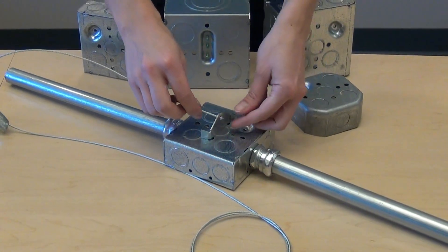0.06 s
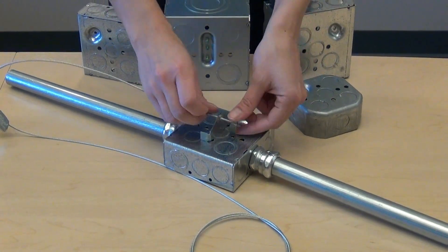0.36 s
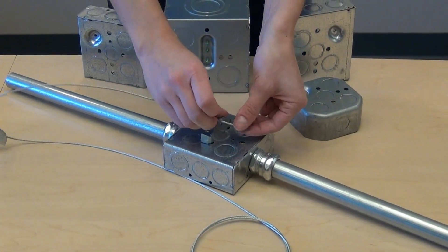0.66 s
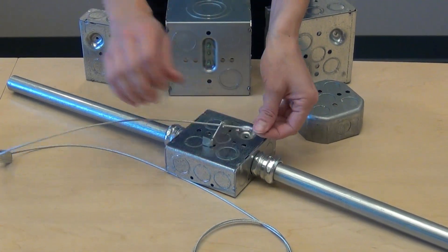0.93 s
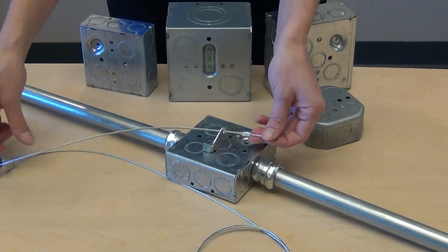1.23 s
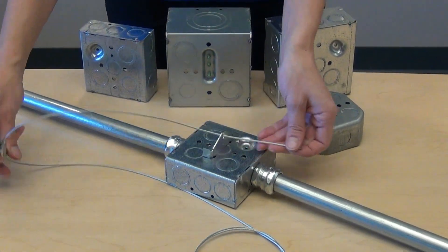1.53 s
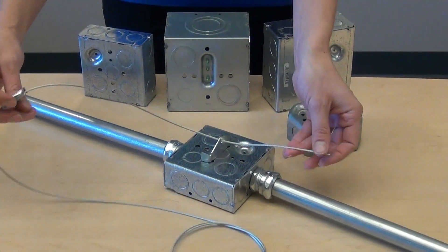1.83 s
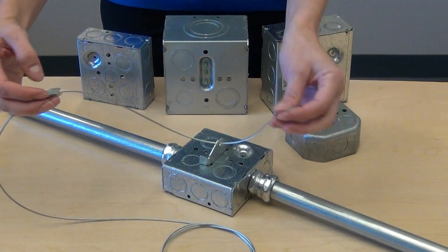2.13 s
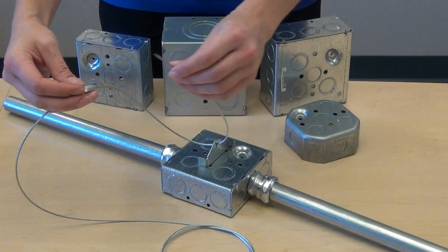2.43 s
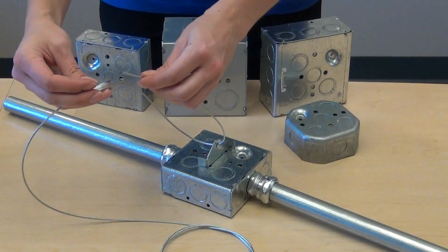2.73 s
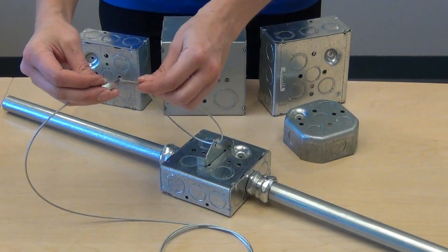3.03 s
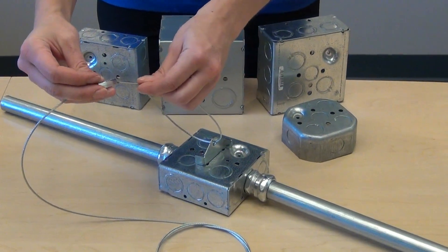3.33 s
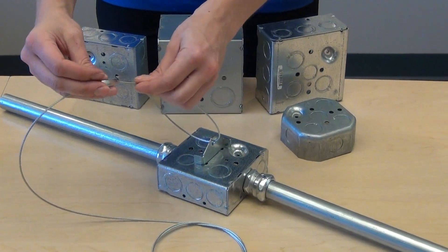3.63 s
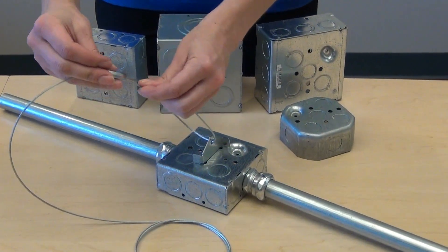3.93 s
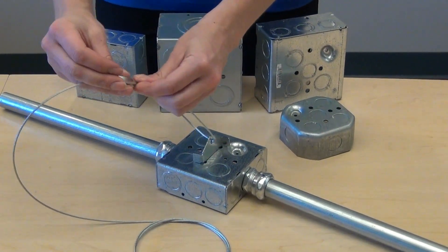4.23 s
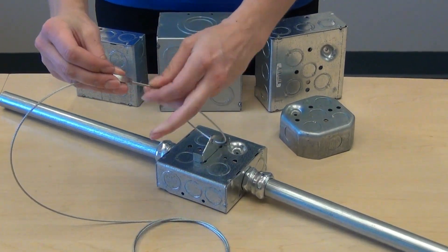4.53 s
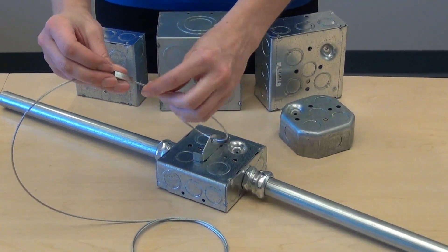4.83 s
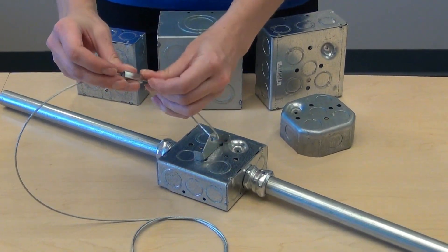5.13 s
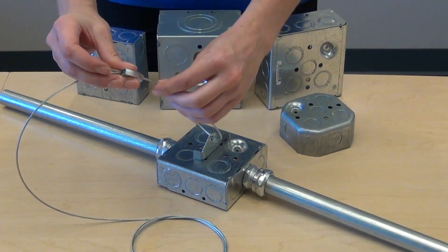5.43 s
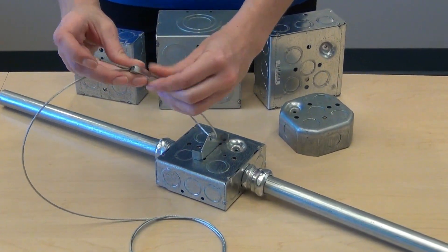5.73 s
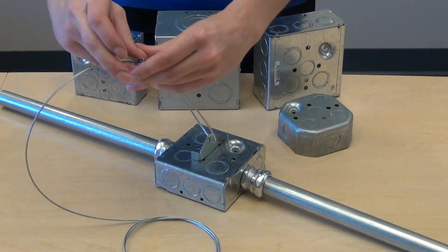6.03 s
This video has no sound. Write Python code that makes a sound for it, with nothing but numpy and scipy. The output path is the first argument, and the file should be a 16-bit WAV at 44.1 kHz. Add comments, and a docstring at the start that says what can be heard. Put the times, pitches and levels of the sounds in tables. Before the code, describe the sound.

A thin steel cable clinks, snaps and scrapes through a sheet-metal bracket, followed by light bumps and ticks over quiet ventilation.

```python
"""A thin steel cable is threaded through the bracket on a sheet-metal box, on a table in a small room.
Over quiet ventilation it knocks against the bracket and rings it, then snaps free of the fingers (0.9 s).
It is drawn through with a swelling scrape (1.5 s) and snaps again, more softly (2.3 s).
From 3.4 s its end is pushed into a gripper with dull bumps, then tiny ticks of single strands,
while the slack keeps clinking on the bracket until 6 s."""
import sys
import numpy as np
from scipy import signal
from scipy.io import wavfile
from scipy.ndimage import uniform_filter1d

SR = 44100
rng = np.random.default_rng(int(sys.argv[2]) if len(sys.argv) > 2 else 0)


def dump_mix(stems):
    """Bounce the given channels to the path in sys.argv[1] as a 16-bit WAV at rate SR."""
    frames = np.atleast_2d(stems).T  # one column per channel
    limited = np.clip(frames, -1, 1)  # hard clip at full scale
    pcm = np.round(limited * 32767).astype(np.int16)
    wavfile.write(sys.argv[1], SR, pcm)


N = 267907
TIME = np.arange(N) / SR
RING_TIME = TIME[:SR // 4]

# ventilation bed: (frequency [Hz], level [dB])
AIR_COLOUR = [(15, -49), (30, -0.5), (42, -9.5), (58, -7), (90, -14), (150, -15.5), (240, -24), (400, -20),
              (600, -21), (900, -16), (1300, -28), (2200, -28), (4000, -32.5), (9000, -35.5), (15500, -40)]
# mains hum and a faint electronic whine: (frequency [Hz], level [dB])
HUM_TONES = [(119.8, -57), (241, -66.5), (15734, -75)]
# stereo width of diffuse sound: (frequency [Hz], side gain [dB])
STEREO_WIDTH = [(60, -34), (150, -22.5), (300, -18), (650, -2), (1300, -8.5), (2500, -9), (5000, -4.5),
                (10000, -10.5)]
# room decay: (frequency [Hz], t60 [s])
ROOM_DECAY = [(150, 0.43), (500, 0.74), (1050, 0.43), (2000, 0.2), (3500, 0.28), (7000, 0.28),
              (15000, 0.14)]
# early reflections off nearby boxes, ceiling and walls: (delay [s], level [dB])
REFLECTIONS = [(.0052, -8), (.0118, -10), (.0185, -10), (.031, -26), (0.034, -10), (.0505, -21),
               (.058, -13.5)]

# the slack brushes the table: (start [s], length [s], level [dB])
SCUFF_STROKES = [(0.747, 0.31, -54.5), (1.335, 0.15, -49.5), (1.994, 0.33, -53), (3.757, 0.1, -51.5)]
# dull tone of that brushing: (frequency [Hz], level [dB])
SCUFF_EQ = [(100, -26), (300, -7), (650, 2.5), (1000, 6), (1400, 3.5), (2400, -9), (3200, -15), (8000, -30),
            (16000, -38)]
# the hands shift box and cable, and the table rumbles: (start [s], length [s], level [dB])
BOX_SHIFTS = [(0.45, 0.74, -53.5), (1.345, 0.71, -53), (2.103, 0.18, -48), (2.462, 0.21, -52.5),
              (3.197, 0.4, -67), (3.717, 1.54, -61.5)]
# the cable rubs the bracket's edge: (start [s], length [s], level [dB], whistle level [dB])
RUB_STROKES = [(0.744, 0.24, -53.5, -68), (1.5, 0.46, -47.5, -62), (2.085, 0.16, -42.5, -59),
               (3.815, 0.059, -51, -75), (4.465, 0.061, -40, -49), (4.645, 0.037, -52, -62),
               (5.961, 0.041, -48, -66)]
# gentle contact favours the low modes: (frequency [Hz], level [dB])
RUB_EQ = [(200, 5.5), (900, 2), (1300, -5), (2100, 0.5), (3500, -14), (7000, -1), (12000, -29)]
# dry scrape of the strands: (frequency [Hz], level [dB])
SCRAPE_EQ = [(300, -10), (1000, 7), (2500, -0.5), (7000, -15), (16000, -25)]
# rumble of the table: (frequency [Hz], level [dB])
RUMBLE_EQ = [(60, -34), (150, -8.5), (225, 1.5), (330, -6), (600, -16), (1000, -15.5), (2000, -25.5),
             (8000, -34)]
# thin whistle of the rubbed edge: (frequency [Hz], level [dB], t60 [s])
WHISTLE_MODES = [(9600, 1, 0.031), (10000, -7, 0.02), (13700, -9, 0.029)]

# single strands catch in the gripper: (time [s], level [dB])
STRAND_TICKS = [(0.3265, -28), (4.0836, -32.5), (4.1308, -24), (4.1397, -21.5), (4.2, -31), (4.217, -29.5),
                (5, -34.5)]
# the gripper ticks over the twist of the cable: (start [s], length [s], level [dB])
GRIPPER_FEEDS = [(5.0407, 0.058, -35.5), (5.609, 0.064, -35.5)]
# bright tone of a tick: (frequency [Hz], level [dB])
TICK_EQ = [(300, -8), (2000, 1.5), (5000, -1), (8000, 2), (11500, 3.5), (14000, -0.5), (16000, -2.5)]
# bumps of fingers and gripper: (time [s], level [dB], relative gripper ring [dB])
BUMP_HITS = [(0.478, -40, -10), (2.351, -31, -21), (3.37, -32, -31), (3.697, -31.5, -12), (3.711, -30, -25),
             (4.047, -27, -14), (4.06, -31.5, -12), (4.085, -35.5, -11), (4.101, -26.5, -9),
             (4.114, -32, -5), (4.145, -30, -11), (6.015, -27, -27)]
# muffled tone of a bump: (frequency [Hz], level [dB])
BUMP_EQ = [(25, -33), (70, -13), (150, -2), (250, -2), (400, 4.5), (650, -5), (1000, -3.5), (1250, 0),
           (1550, -15.5), (2100, -11), (3000, -27.5), (16000, -35)]
# table top and box under a soft blow: (frequency [Hz], level [dB], t60 [s])
TABLE_MODES = [(164, -11, 0.17), (247, 2.5, 0.092), (352, -3, 0.058), (1270, -6, 0.089)]
# the small metal gripper: (frequency [Hz], level [dB], t60 [s])
GRIPPER_MODES = [(6380, -3, 0.13), (6680, -4, 0.071), (7020, 5, 0.091), (7900, -8, .08)]

# the cable is drawn through the fingers: (start [s], length [s], level before the swell [dB])
DRAW_STROKE = (1.48, 0.46, -52)
# fast, hissing start of the draw: (frequency [Hz], level [dB])
LOOSE_GRIP_EQ = [(88, -50), (150, -25), (231, 5), (398, -3.5), (514, -11), (589, 1.5), (1080, -10),
                 (1290, 6), (1630, -16), (2060, -16), (2400, -6.5), (10600, -16.5), (16000, -24)]
# lower tone once gripped harder: (frequency [Hz], level [dB])
TIGHT_GRIP_EQ = [(88, -17), (150, -15), (226, 5.5), (270, -21), (383, 1), (675, -10.5), (923, 2.5),
                 (1480, -5.5), (1790, 3.5), (5460, -7.5), (6640, -15.5), (11000, -11), (16000, -27)]

# the fingers let go of the cable: (time [s], level [dB])
SNAP_HITS = [(0.9000, -8), (0.9074, -12), (2.3490, -17)]
# sharp edge of a snap: (frequency [Hz], level [dB])
SNAP_EDGE_EQ = [(80, -52), (400, 2), (900, 8), (2800, 16), (4500, -2), (10000, -14), (16000, -22)]
# brief ring of a snap: (frequency [Hz], level [dB], t60 [s])
SNAP_MODES = [(1004, -6, 0.17), (1350, 7, 0.0074), (2330, 14.5, 0.0028)]
# the freed cable rattles on: (frequency [Hz], level [dB])
SHIVER_EQ = [(100, -30), (400, -6), (1000, 1), (1800, -2), (2500, 1), (3500, -18), (5000, -28),
             (16000, -26)]
# what a snap throws into the room: (frequency [Hz], level [dB])
SNAP_SEND_EQ = [(100, 1), (550, 3.5), (1000, -2), (1400, 5), (2500, -4), (3600, -4.5), (12000, -4)]

# the cable hits the bracket: (time [s], level [dB], relative brightness [dB], relative zing [dB])
KNOCK_HITS = [(0.0324, -36.5, -11.5, -3), (0.1296, -27, -4.5, -13.5), (0.1651, -32, -21, -32),
              (0.1985, -33, -9.5, -21), (0.229, -32, -9.5, -23), (0.2515, -32.5, -7, -11),
              (0.327, -27, -2, -29), (0.3726, -24, -5, -30), (0.409, -32.5, -10, -36),
              (0.4473, -29, -7, -15), (0.4764, -18.5, -7.5, -22), (1.4646, -41.5, -29, -20),
              (2.0515, -43, -28, -22), (2.2378, -33.5, -16, -14.5), (2.3459, -22, -9.5, -17.5),
              (2.747, -47.5, -24, -23), (3.0996, -44.5, -20, -22), (3.273, -42, -10, -31),
              (3.905, -19, -10, -22.5), (4.1922, -21.5, -9, -13), (4.2488, -19.5, -3, -12),
              (4.352, -33.5, -7, -13), (4.3748, -15.5, -7, -17), (4.4227, -34.5, -7, -2.5),
              (4.5215, -24, -8.5, -32), (4.5352, -27, -9.5, -4), (4.6195, -32.5, -10, -32),
              (4.6808, -26.5, -34, -26), (4.7411, -29.5, -11, -25), (4.8059, -20.5, -16.5, -26),
              (4.8356, -26.5, -12, -30), (4.8565, -30, -22, -25), (4.8818, -25, -5.5, -36),
              (4.9526, -30.5, -47, -24), (5.02, -28, -48, -17), (5.1802, -35, -32, -32),
              (5.2851, -26, -21, -24), (5.3109, -23, -12.5, -26), (5.324, -18.5, -12, -23),
              (5.3837, -29, -16, -10.5), (5.5134, -12.5, -8, -22), (5.5759, -19.5, -10, -32),
              (5.7343, -32, -19, -23), (5.8487, -12, -4, -8.5), (5.9851, -32.5, -16, -28),
              (6.0003, -24, -15, -25), (6.0119, -30.5, 1, -10), (6.0233, -22, -44, -33)]
# the trembling slack grazes the bracket: (level [dB], relative brightness [dB], relative zing [dB])
LIGHT_TOUCH = (-50.5, -14, -29)
# the bracket and its box: (frequency [Hz], level [dB], t60 [s])
BRACKET_MODES = [(165.7, -26.5, 0.62), (241.7, -24, 0.13), (328.6, -29, 0.19), (843, -14, 0.15),
                 (929.3, -16.5, 0.18), (1232, -12, 0.21), (1314.8, 0.5, 0.084), (1356, -10.5, 0.06),
                 (1556, -30.5, 0.81), (2022, 2.5, 0.036), (2077, 0, 0.041), (2260, -13, 0.12),
                 (2480, -9.5, 0.037), (2576, -16, 0.11), (3100, -15.5, 0.043), (3300, -6, 0.016),
                 (3556, -4.5, 0.029), (3897, -11, 0.051), (4200, -31, 0.048), (4520, -10, 0.048),
                 (5386, -11.5, 0.017), (5605, -5, 0.039), (5870, -10.5, 0.016), (6050, -18, .06),
                 (6780, -35.5, 0.28), (7160, -21.5, 0.08), (9580, -6, 0.038), (11000, -30, 0.017),
                 (10900, -32, .04), (10940, -11, 0.049)]
# dense, short clatter of the sheet metal: (frequency [Hz], level [dB])
CLATTER_EQ = [(60, -54), (200, -6.5), (600, -8.5), (1200, -11), (1700, -19), (3300, -3), (7000, 1.5),
              (8200, -16), (9500, 4), (11600, 9), (13500, -12), (16000, -15)]


def amp(db):
    """Decibels to gain."""
    return 10 ** (np.asarray(db) / 20)


def unit_rms(x, count=None):
    """Scales to rms 1, judged over the first count samples."""
    return x / np.sqrt(np.mean(x[:count] ** 2) + 1e-20)


def curve_at(points, hz):
    """Reads a curve on a log-frequency axis."""
    freqs, values = np.transpose(points)
    return np.interp(np.log(hz + 1), np.log(freqs + 1), values)


def add(mix, time_s, sound):
    """Mixes a sound in at time_s."""
    part = mix[max(round(time_s * SR), 0):][:len(sound)]
    part += sound[:len(part)]


def through(x, response):
    """Convolves and keeps the length."""
    return signal.fftconvolve(x, response)[:len(x)]


def eq(x, points):
    """Minimum-phase EQ: nothing rings ahead of an attack."""
    log_gain = np.log(amp(curve_at(points, abs(np.fft.fftfreq(4096, 1 / SR)))))
    spectrum = np.exp(np.conj(signal.hilbert(log_gain)))
    return through(x, np.fft.ifft(spectrum).real[:2048])


def band(x, hz, kind):
    """Butterworth filter."""
    return signal.sosfilt(signal.butter(4, hz, kind, fs=SR, output="sos"), x)


def ring(modes, vary_db=0, detune=0):
    """Damped sines; the point of contact changes their phase, strength and, slightly, pitch."""
    hz, db, t60 = np.transpose(modes)[:, :, None]
    phase, strength, shift = rng.uniform(-0.98, 1, (3, len(modes), 1))
    cycles = hz * (1 + detune * shift) * RING_TIME
    envelopes = amp(db + vary_db * strength - 60 * RING_TIME / t60)
    return (envelopes * np.sin(np.pi * (2 * cycles + phase))).sum(0)


def burst(decay_s):
    """Noise that dies away."""
    return rng.standard_normal(len(RING_TIME)) * np.exp(-RING_TIME / decay_s)


def flutter(depth_db, grain_samples):
    """A gain that wanders at random."""
    return amp(depth_db * unit_rms(uniform_filter1d(rng.standard_normal(N), size=grain_samples)))


def friction(rough_db, grain_samples):
    """Noise whose strength jumps as strand after strand catches and slips."""
    return unit_rms(rng.standard_normal(N) * flutter(rough_db, grain_samples))


def stroke(start, length, rise_s, fall_s):
    """Envelope of one hand movement: it rises, holds and dies away."""
    t = TIME - start
    return np.clip(t / rise_s, 0, 1) * np.exp(-np.maximum(t - length, 0) / fall_s)


def stereo(mid, side):
    """Mid and side to left and right; the bass stays near the centre."""
    side = eq(side, STEREO_WIDTH)
    return np.array([mid + side, mid - side])


def background(air_db=-52):
    """Room tone: rushing ventilation and steady hum."""
    mid, side = (amp(air_db) * unit_rms(eq(rng.standard_normal(N), AIR_COLOUR)) for _ in range(2))
    hum = sum(amp(db) * np.sqrt(2) * np.sin(2 * np.pi * (hz * TIME + rng.random()))
              for hz, db in HUM_TONES)
    return stereo(mid + hum, side)


def room_tail(predelay_s=0.0064, rise_s=0.0023):
    """A few distinct echoes over dense reflections, each band dying at its own speed."""
    hz, t, noise = signal.stft(rng.standard_normal(SR // 2), SR, nperseg=256)
    decay = amp(-60 * t / curve_at(ROOM_DECAY, hz)[:, None])
    tail = signal.istft(noise * decay, SR, nperseg=256)[1]
    tail *= np.clip((TIME[:len(tail)] - predelay_s) / rise_s, 0, 1)
    tail /= np.linalg.norm(tail)
    bounce = band(signal.unit_impulse(64), 6100, "low")  # surfaces soak up the treble
    for delay, db in REFLECTIONS:
        add(tail, delay, rng.choice([-1, 1]) * amp(db) * bounce)
    return tail / np.linalg.norm(tail)


def room(send, tails=3, cycle_hz=2.3):
    """Several reverb tails crossfade in turn, so each hit's reverb has a slightly different colour."""
    fades = [np.maximum(np.cos(2 * np.pi * (TIME * cycle_hz - k / tails)), 0) for k in range(tails)]
    return sum(through(send * fade, room_tail()) for fade in fades / np.linalg.norm(fades, axis=0))


def scuffs(rise_s=0.042, fall_s=0.04):
    """Dull brushing of the slack on the table top."""
    brushing = sum(amp(db) * stroke(start, length, rise_s, fall_s) for start, length, db in SCUFF_STROKES)
    return brushing * unit_rms(eq(friction(rough_db=6, grain_samples=300), SCUFF_EQ))


def sliding(before_s=0.0078, after_s=0.06, db_per_knock_db=0.61):
    """How hard the cable slides on the bracket: it swells into each knock and trails off after it."""
    power = np.zeros(N)
    for time_s, db, *_ in KNOCK_HITS:
        fade = np.where(TIME < time_s, (time_s - TIME) / before_s, (TIME - time_s) / after_s)
        power += (amp(db_per_knock_db * db) * np.exp(-np.minimum(fade, 20))) ** 2
    return np.sqrt(power)


def rubs(slide_db=-32, slide_rumble_db=-33, scrape_db=-11):
    """Friction keeps the bracket's modes ringing, with a thin whistle, and rumbles in the table."""
    singing = through(friction(rough_db=4.5, grain_samples=120), ring(BRACKET_MODES))
    scrape = eq(friction(rough_db=3, grain_samples=80), SCRAPE_EQ)
    metal = unit_rms(eq(singing, RUB_EQ)) + amp(scrape_db) * unit_rms(scrape)
    whistle = unit_rms(through(friction(rough_db=5.5, grain_samples=300), ring(WHISTLE_MODES)))
    rumble = unit_rms(eq(friction(rough_db=1, grain_samples=900), RUMBLE_EQ))
    out = sliding() * (amp(slide_db) * metal + amp(slide_rumble_db) * rumble)
    for start, length, db, whistle_db in RUB_STROKES:
        pressure = stroke(start, length, rise_s=0.026, fall_s=0.013)
        out += pressure * (amp(db) * metal + amp(whistle_db) * whistle)
    for start, length, db in BOX_SHIFTS:
        out += amp(db) * stroke(start, length, rise_s=0.073, fall_s=0.047) * rumble
    return out


def feed_ticks(ticks_per_s=85, jitter_s=0.002, spread_db=0.5):
    """The twist passes through the gripper in nearly regular runs; rows as in STRAND_TICKS."""
    return [(start + t + jitter_s * rng.uniform(-0.82, 1), db + spread_db * rng.uniform(-1, 1))
            for start, length, db in GRIPPER_FEEDS for t in np.arange(0, length, 1 / ticks_per_s)]


def ticks(trim_db=-3, decay_s=0.0018, crackle_db=-14, crackle_s=0.022, neighbours=4):
    """Tiny bright clicks of single strands, each trailed by a faint crackle of its neighbours."""
    out = np.zeros(N)
    for time_s, db in STRAND_TICKS + feed_ticks():
        crackle = [(crackle_s * rng.random(), crackle_db + rng.uniform(-2, 3)) for _ in range(neighbours)]
        for delay, strand_db in [(0.00069, 0)] + crackle:
            click = unit_rms(eq(burst(decay_s)[:2048], TICK_EQ), count=80)
            add(out, time_s + delay, amp(db + trim_db + strand_db) * click)
    return out


def bumps(thud_db=-10, table_db=-11, ring_db=-12, decay_s=0.011, onset_samples=600):
    """Soft, damped blows that thump the table and barely ring the gripper."""
    out = np.zeros(N)
    soft_attack = np.minimum(RING_TIME / 0.0016, 1)
    for time_s, db, gripper_db in BUMP_HITS:
        thud = amp(thud_db) * unit_rms(eq(burst(decay_s), BUMP_EQ), onset_samples)
        table = soft_attack * ring(TABLE_MODES, vary_db=3.5, detune=0.022)
        thump = amp(table_db) * unit_rms(table, onset_samples)
        ping = amp(ring_db + min(gripper_db, -12)) * unit_rms(ring(GRIPPER_MODES), onset_samples)
        add(out, time_s, amp(db) * (thud + thump + ping))
    return out


def draw(tighten_s=1.7, blend_s=0.034, swell_db_per_s=16.5,
         rasp_db=-6, rasp_hz=3620, rasp_width_hz=900, sag_hz_per_s=4000):
    """Twisted strands hiss through the fingers; the grip tightens and a rasp sinks as the pull slows."""
    start, length, db = DRAW_STROKE
    zones_hz = [200, 1500], [1500, 2600], [2600, 4200], [4200, 7000], [7000, 16000]
    slips = friction(rough_db=2.4, grain_samples=160)
    # each band swells and sinks by itself as the twist turns in the grip
    grain = sum(band(slips, zone, "band") * flutter(depth_db=2.4, grain_samples=1300) for zone in zones_hz)
    loose, tight = eq(grain, LOOSE_GRIP_EQ), eq(grain, TIGHT_GRIP_EQ)
    loose, tight = (x / band(x, [2500, 8000], "band").std() for x in (loose, tight))  # equally hissy
    grip = 0.5 + 0.5 * np.tanh((TIME - tighten_s) / blend_s)
    centre_hz = rasp_hz - sag_hz_per_s * (np.clip(TIME, tighten_s, start + length) - tighten_s)
    carrier = np.cos(2 * np.pi * np.cumsum(centre_hz) / SR)
    rasp = unit_rms(band(rng.standard_normal(N), rasp_width_hz / 2, "low") * carrier)
    swell = amp(db + swell_db_per_s * np.clip(TIME - start, 0, length))
    effort = swell * stroke(start, length, rise_s=0.069, fall_s=0.02)
    return effort * ((1 - grip) * loose + grip * (tight + amp(rasp_db) * rasp))


def snaps(low_hz=1300, high_hz=2350, click_s=0.00179, shiver_s=0.036,
          low_db=-1, ring_db=-20, edge_db=-10, shiver_db=-28):
    """The cable springs free: a hollow click a few cycles long, a sharp edge, a ring and a shiver."""
    out = np.zeros(N)
    arch = np.sqrt(abs(np.sin(np.pi * np.minimum(RING_TIME / click_s, 1))))
    tones = amp(low_db) * np.sin(2 * np.pi * low_hz * RING_TIME) + np.sin(2 * np.pi * high_hz * RING_TIME)
    edge = eq(signal.unit_impulse(len(RING_TIME)), SNAP_EDGE_EQ)
    click = 0.5 * arch * tones + amp(edge_db) * edge / abs(edge).max()
    for time_s, db in SNAP_HITS:
        shiver = unit_rms(eq(burst(shiver_s), SHIVER_EQ), count=441)
        add(out, time_s, amp(db) * (click + amp(ring_db) * ring(SNAP_MODES) + amp(shiver_db) * shiver))
    return out


def touches(per_s=3, spread_db=3):
    """The trembling slack grazes the bracket at random moments; rows as in KNOCK_HITS."""
    db, bright_db, zing_db = LIGHT_TOUCH
    return [(when * N / SR, db + spread_db * (2 * force - 1), bright_db, zing_db)
            for when, force in rng.random((round(per_s * N / SR), 2))]


def knocks(trim_db=-6, clatter_db=-3, clatter_s=0.0066, attack_s=0.0013, damping_s=0.051,
           rebound=0.25, rebound_s=0.004, bright_hz=2850, zing_hz=8400, onset_samples=441):
    """Each hit clatters for a few ms and rings the bracket, with its own brightness and zing."""
    out = np.zeros(N)
    for time_s, db, bright_db, zing_db in KNOCK_HITS + touches():
        rise_s = attack_s * amp(-0.38 * bright_db)  # dull hits swell more slowly
        attack = np.interp(RING_TIME, [0, rise_s], [0.29, 1])
        clatter = unit_rms(eq(burst(clatter_s), CLATTER_EQ), onset_samples)
        clang = unit_rms(ring(BRACKET_MODES, vary_db=3.5, detune=0.01), onset_samples)
        hit = attack * (clang + amp(clatter_db) * clatter)
        hit *= np.exp(-RING_TIME / (damping_s * rng.uniform(0.3, 2.4)))  # the resting cable chokes it
        add(hit, rebound_s * rng.uniform(0.5, 1.5), rebound * hit)  # the springy cable touches again
        body = unit_rms(band(hit, bright_hz, "low"), onset_samples)
        bright = unit_rms(band(hit, [bright_hz, zing_hz], "band"), onset_samples)
        zing = unit_rms(band(hit, zing_hz, "high"), onset_samples)
        add(out, time_s, amp(db + trim_db) * (body + amp(bright_db) * bright + amp(zing_db) * zing))
    return out


def scene():
    """Close sound from the middle of the table, its reverb and the room tone."""
    metal = knocks() + rubs()
    snap, thuds, clicks = snaps(), bumps(), ticks()
    hiss = draw() + scuffs()
    direct = metal + snap + thuds + clicks + hiss
    send = (amp(-10) * (metal + hiss) + amp(-4.5) * eq(snap, SNAP_SEND_EQ)
            + amp(-6.5) * thuds + amp(-9.5) * clicks)
    side = amp(-12) * np.roll(direct, SR // 1000)  # the box's faces radiate differently left and right
    return stereo(direct, side) + stereo(room(send), room(send)) + background()


def record(dry):
    """A steep high cut at 16 kHz on the whole mix."""
    high_cut = signal.firwin(301, 16000, window=("kaiser", 9), fs=SR)
    return signal.oaconvolve(dry, high_cut[None], "same")


dry = scene()
out = record(dry)
dump_mix(out)
```